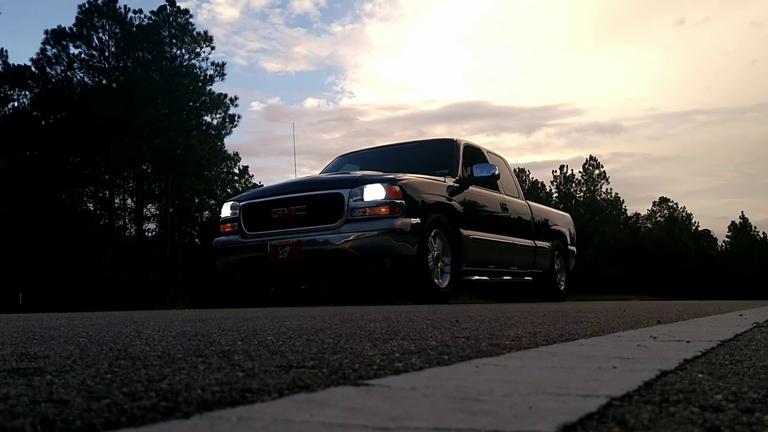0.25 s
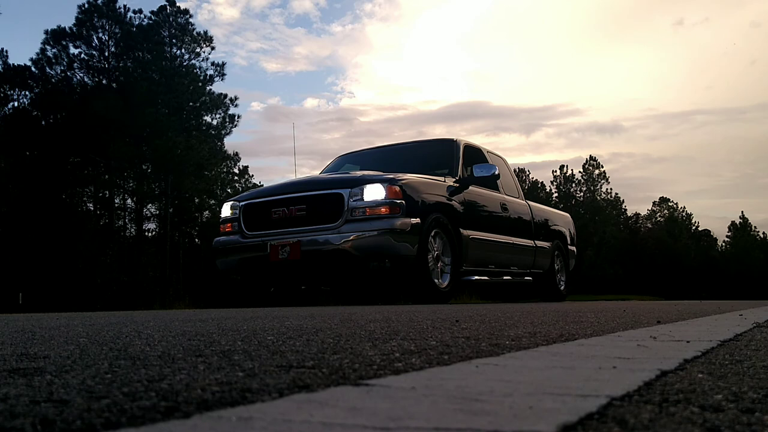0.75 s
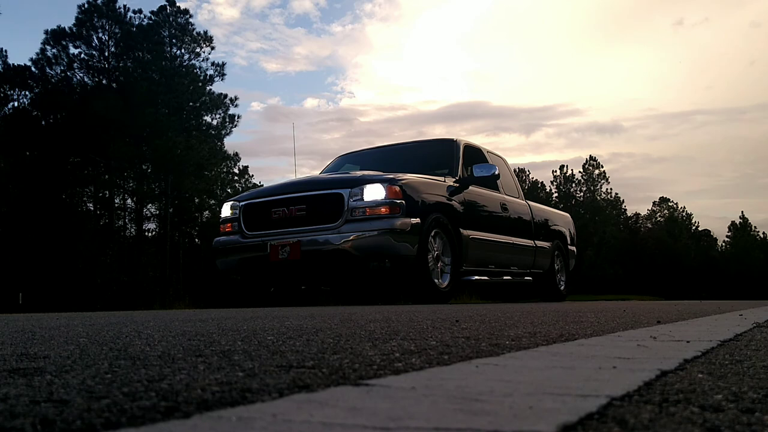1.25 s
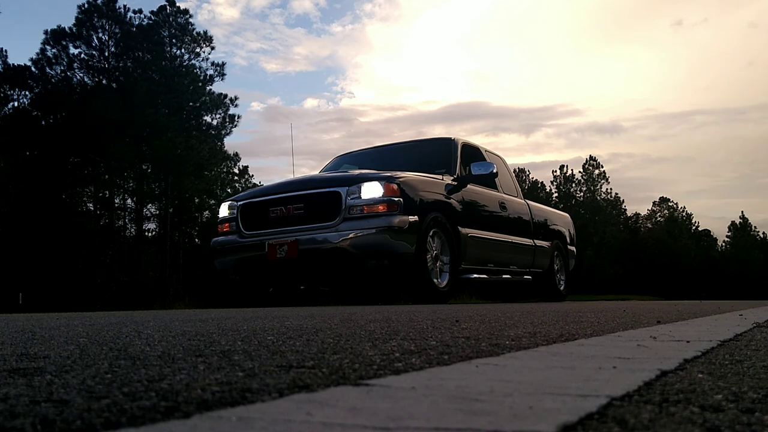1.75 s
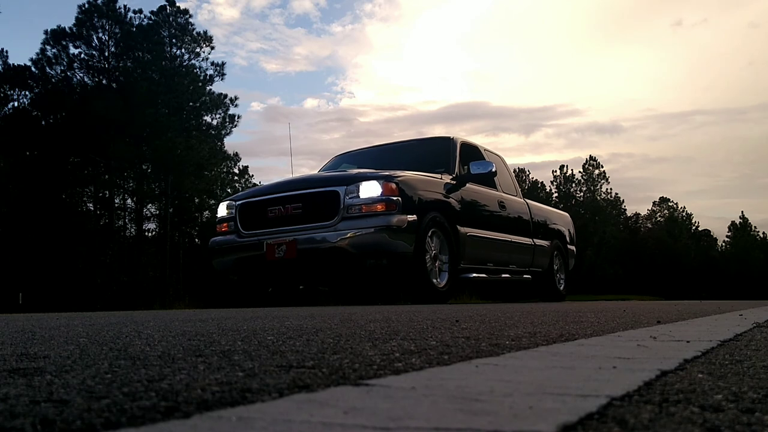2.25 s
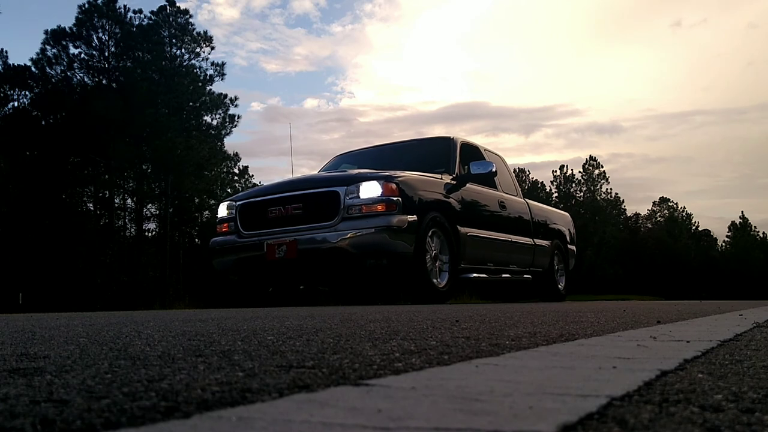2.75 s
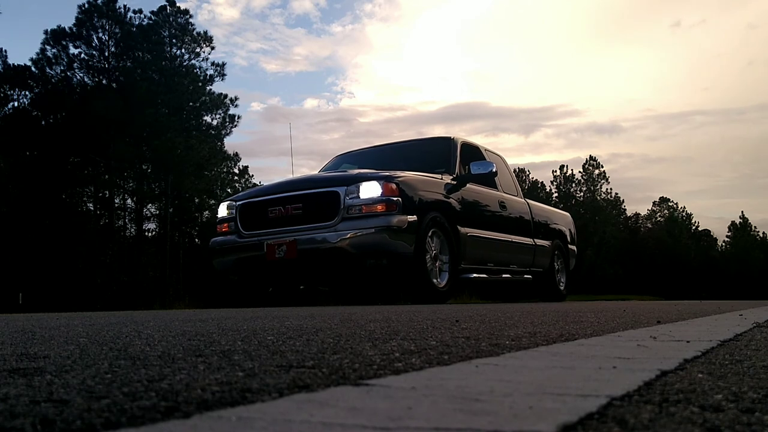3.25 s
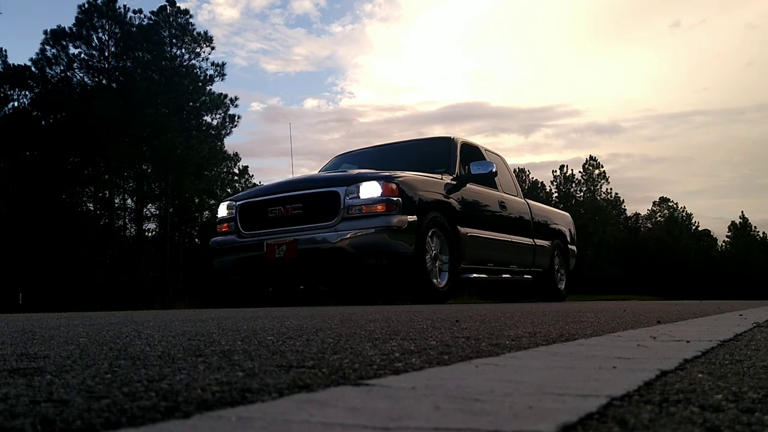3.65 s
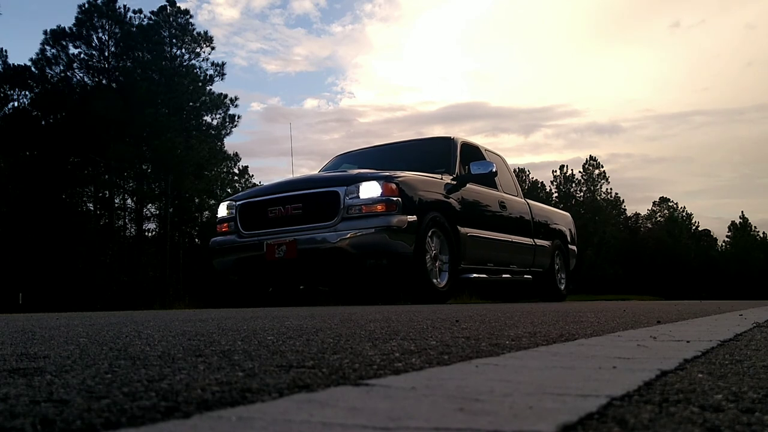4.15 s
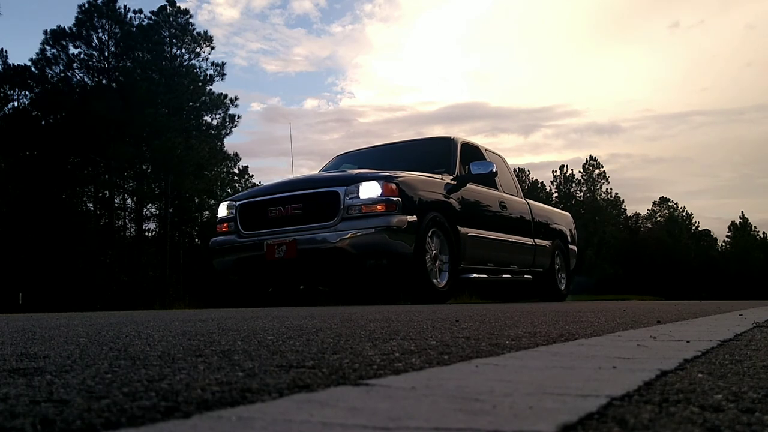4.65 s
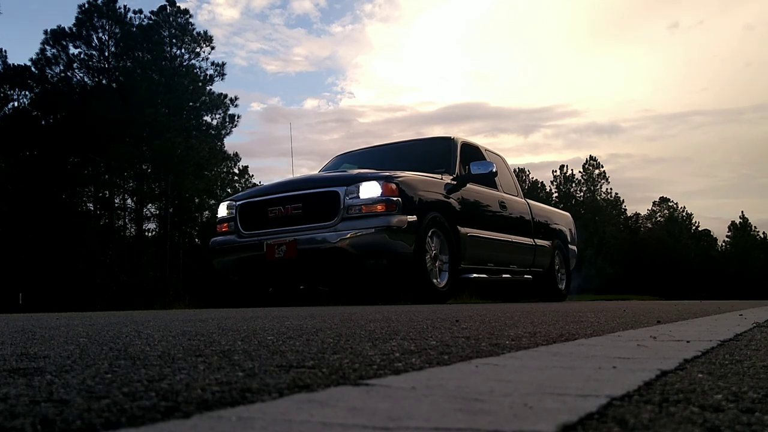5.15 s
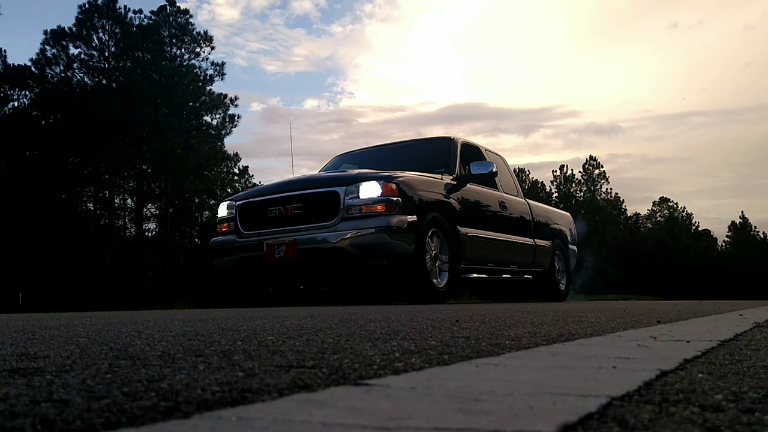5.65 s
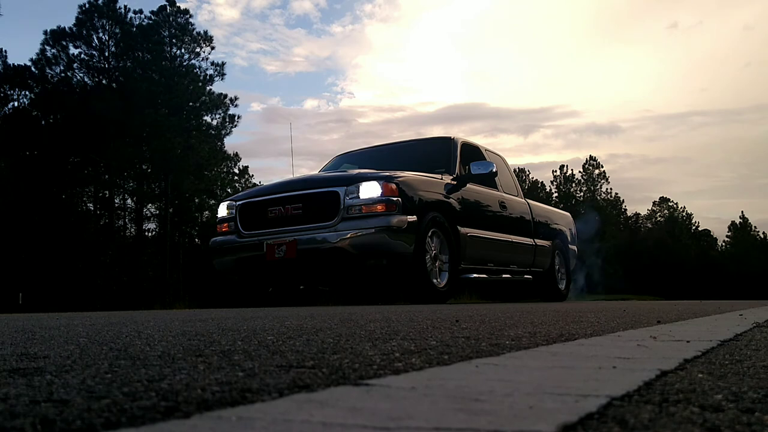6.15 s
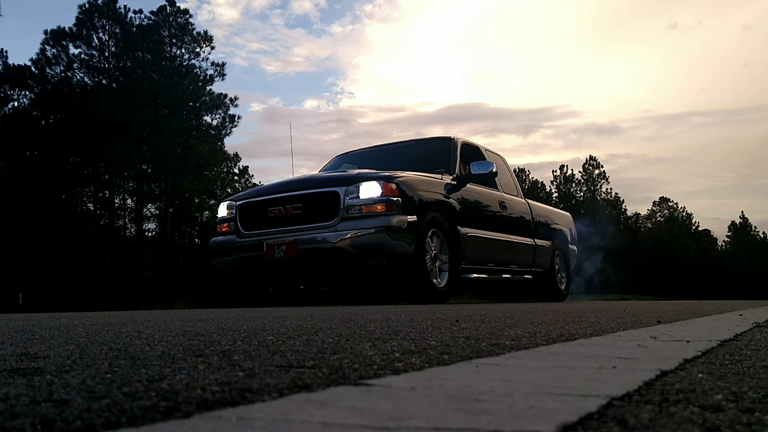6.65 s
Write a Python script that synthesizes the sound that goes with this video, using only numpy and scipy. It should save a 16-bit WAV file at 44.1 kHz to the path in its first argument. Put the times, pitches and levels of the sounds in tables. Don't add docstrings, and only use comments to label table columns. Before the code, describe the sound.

A truck held on its brakes: soft low idle, small bright valve ticks, then a quick swell to a deep, uneven exhaust roar with intake hiss. Rough rubber scrubbing starts about two seconds in, short squeaks compete, a dull knock sounds, and one piercing screech takes over, wavering with each wheel turn. Open roadside air, little echo, stereo microphone ahead of the truck with automatic gain ducking the engine under the squeal.

```python
import sys
import numpy as np
from scipy import signal
from scipy.fft import rfft, irfft, next_fast_len
from scipy.io import wavfile
from scipy.ndimage import uniform_filter1d, minimum_filter1d, map_coordinates

SR = 44100
rng = np.random.default_rng(int(sys.argv[2]) if len(sys.argv) > 2 else 0)


def output_pcm(signal):
    pcm = np.clip(np.atleast_2d(signal).T, -1, 1) * 32767
    wavfile.write(sys.argv[1], SR, np.round(pcm).astype(np.int16))


def to_linear_factor(level_db):
    exponent = np.asarray(level_db, float) / 20
    return 10 ** exponent


N = 304731

HOLD_HZ = 21.5
LOCK_S = 2.97


def unit(x):
    return x / np.sqrt(np.mean(np.abs(x) ** 2) + 1e-20)


def along(points, hz):
    f, v = np.transpose(points)
    return np.interp(np.log(hz + 1), np.log(f + 1), v)


def curves(rows):
    s, *cols = np.transpose(rows)
    return [np.interp(np.arange(N) / SR, s, c) for c in cols]


def since(s):
    return np.clip(np.arange(N) / SR - s, 0, None)


def sounding(rows, fade=0.017):
    s0, s1 = rows[0][0], rows[-1][0]
    return np.interp(np.arange(N) / SR, [s0 - fade, s0, s1, s1 + fade], [0, 1, 1, 0])


def bumps(rows, width_s):
    return sum(db * np.exp(-((np.arange(N) / SR - s) / width_s) ** 2) for s, db in rows)


def wobble(rate):
    knots = rng.standard_normal(int(N * rate / SR) + 4)
    return map_coordinates(knots, [np.arange(N) * rate / SR])


def filtered(x, response):
    m = next_fast_len(N + 8192)
    mirror = x[..., :-2049:-1] * np.linspace(1, 0, 2048)
    x = np.concatenate([x, mirror], axis=-1)
    return irfft(rfft(x, m) * response(np.fft.rfftfreq(m, 1 / SR)), m)[..., :N]


def rush(spectrum, alike, patchy_db):
    z = signal.stft(rng.standard_normal((2, N)), nperseg=512)[2]
    field = uniform_filter1d(rng.standard_normal(z.shape[1:]), size=5, axis=0)
    field = uniform_filter1d(field, size=8, axis=1)
    pair = signal.istft(z * to_linear_factor(patchy_db * unit(field)), nperseg=512)[1][:, :N]
    closed = [(0.97, -120)] + list(spectrum) + [(17000, -120)]
    shape = lambda hz: to_linear_factor(along(closed, hz))
    turn = lambda hz: np.arccos(np.clip(along(alike, hz), -1, 1)) / 2
    mid, side = filtered(pair, lambda hz: shape(hz) * [np.cos(turn(hz)), np.sin(turn(hz))])
    return unit(np.array([mid + side, mid - side]))


def note(hz, jitter_hz, flutter_db, rate):
    turns = np.cumsum(hz + jitter_hz * wobble(rate)) / SR
    return unit(to_linear_factor(flutter_db * wobble(rate)) * np.exp(2j * np.pi * turns))


# (time [s], offset from its note [Hz], level [dB])
CATCH = [
    (2.71, -30, -22.5),
    (2.73, -16, -9.5),
    (2.76, -5, -1),
    (2.82, 15, -1.5),
    (2.9, 17.5, -4.5),
    (2.94, 36.5, -11),
    (2.96, 6, -1),
    (2.98, 0, -0.5),
]
# (share of the turn [0-1], pitch offset [Hz], level [dB])
TURN = [
    (0, 0, -1),
    (0.199, -13, -0.66),
    (.45, -5, 0.16),
    (0.699, 8, -0.4),
    (.88, 12, 0.4),
    (1.002, 0, -2),
]
# (time [s], depth [dB])
SLIPS = [(2.84, 0.5), (3.68, 1.5), (3.73, 4), (5.12, 3.5), (5.2, 4.5), (5.31, 2.5), (5.5, 1.5), (5.64, 3),
         (5.71, 1.5), (5.88, 0.5), (6.12, 4), (6.17, 1.5), (6.73, 4)]


def squeal():
    start_hz, sag_hz_per_s2 = 1114.5, 2.6
    start_db, fade_db_per_s = -3.5, 0.83
    spun = since(2.95)
    share = (2.27 * spun + .11 * spun ** 2 / 2) % 1
    at, turn_hz, turn_db = np.transpose(TURN)
    catch_hz, catch_db = curves(CATCH)
    slip_db = bumps(SLIPS, 0.019) - catch_db
    wave_hz = np.interp(share, at, turn_hz) * (1 + .2 * wobble(3))
    hz = start_hz - sag_hz_per_s2 * since(LOCK_S) ** 2 + wave_hz + catch_hz
    db = start_db - fade_db_per_s * since(LOCK_S) + np.interp(share, at, turn_db) - slip_db
    return hz, db, slip_db


def locked_tone(main, lock):
    grip = to_linear_factor((.5 + .1 * since(LOCK_S)) * wobble(50)) * (1 + .1 * wobble(260))
    third_db = np.interp(np.arange(N) / SR, [3, 5.3, 5.8, 6.9], [-15.5, -7, 4.0, 7.0])
    second = to_linear_factor(-27 + 0.74 * wobble(5.5)) * main ** 2
    third = to_linear_factor(-27 + third_db) * main ** 3
    carcass_shake = to_linear_factor(-22.0) * main * note(115, jitter_hz=31.34, flutter_db=-3.0, rate=14)
    return lock * (grip * main + second + third + carcass_shake)


# (time [s], level [dB])
KICKS = [
    (2.791, 3.7),
    (2.885, 9),
]


def upper_note(main, hz):
    gone = since(CATCH[0][0])
    follow_hz = .7 * (hz - uniform_filter1d(hz, size=18000))
    under_hz = 128 + 19 * gone + 2 * wobble(4) + follow_hz
    grit = .4 * (wobble(150) + 1j * wobble(150))
    beads = unit(np.clip(1 + .7 * wobble(75), 0, None) + grit)
    beat = beads * note(under_hz, jitter_hz=20, flutter_db=1, rate=45)
    db = -20 - 1.5 * since(LOCK_S) + bumps(KICKS, .02) + 0.92 * curves(CATCH)[1] + 0.54 * wobble(25)
    return main ** 2 * beat.conj() * to_linear_factor(db) * (gone > 0)


def rival(rows, jitter_hz, flutter_db, fray):
    hz, db = curves(rows)
    grit = 1 + fray * (wobble(240) + 1j * wobble(240))
    return unit(grit * note(hz, jitter_hz, flutter_db, rate=45)), to_linear_factor(db + 4.0) * sounding(rows)


# (time [s], length [s], start pitch [Hz], end pitch [Hz], level [dB])
RIVALS = [(2.18, 0.23, 1065, 1068, -24), (2.21, 0.1, 950, 950, -30), (2.23, 0.13, 1200, 1220, -24),
          (2.31, 0.14, 1178, 1150, -20.5), (2.33, .14, 1080, 1067, -20), (2.42, .14, 1210, 1265, -18),
          (2.45, .15, 1115, 1158, -22), (2.54, 0.067, 1270, 1356, -22), (2.58, 0.08, 1238, 1208, -14),
          (2.63, .1, 1100, 1080, -23.5), (2.67, 0.077, 1190, 1233, -16)]


def rivals():
    edge_s = 0.0191
    rough = rival([(0, 0, 0)], jitter_hz=8, flutter_db=1.5, fray=.5)[0]
    out = np.zeros(N, complex)
    for k, (s, life, from_hz, to_hz, db) in enumerate(RIVALS):
        t = np.arange(-2 * edge_s, life + 2 * edge_s, 1 / SR)
        turns = from_hz * t + (to_hz - from_hz) * t ** 2 / (2 * life)
        z = rough[k * SR // 2:][:len(t)] * np.exp(2j * np.pi * turns)
        edge = np.clip((life / 2 - np.abs(t - life / 2)) / (2 * edge_s) + .5, 0, 1)
        out[round((s + t[0]) * SR):][:len(t)] += to_linear_factor(db + 4.0) * edge * (z + to_linear_factor(-8.5) * z ** 2)
    return out


# (frequency [Hz], level [dB per Hz])
BODY = [(500, -29), (800, -10), (1000, 0.5), (1250, 0.5), (1500, 0), (1900, -2), (2900, -7), (4800, -21),
        (6000, -27.5), (7500, -46.5), (11000, -36), (15500, -58)]
# (frequency [Hz], level [dB per Hz])
RASP = [(1700, -39.5), (1950, 0.5), (2300, 2.5), (2650, -3), (3000, -14.5), (3500, -2), (4500, -31)]
# (frequency [Hz], likeness [0-1])
REAR = [(600, 1), (1700, .95), (2400, .65), (3000, .8), (4300, .92), (5200, .5), (12000, 0.43)]


def scrub(slip_db):
    break_s, spin_s = 2.08, 2.32
    stuck = np.clip(1 - since(break_s) / (spin_s - break_s), 0, 1)
    choked = np.clip(since(CATCH[0][0] - .05) / 0.41, 0, 1)
    burst_db = uniform_filter1d(slip_db * (since(CATCH[2][0]) > 0), size=2000)
    body_db = -24 - 13 * stuck + 0.82 * burst_db + 0.3 * wobble(12)
    rasp_db = -21.5 - 21 * stuck - 6 * choked - 2.26 * since(LOCK_S) + 1.2 * wobble(12)
    body = to_linear_factor(body_db) * rush(BODY, REAR, patchy_db=1.5)
    rasp = to_linear_factor(rasp_db) * rush(RASP, REAR, patchy_db=1.5)
    return sounding([(break_s,), (N / SR,)], fade=0.13) * (body + rasp) * to_linear_factor(0.71 * wobble(90))


# (time [s], pitch [Hz], level [dB])
SIDELONG = [
    (2.76, 1343, -34),
    (2.99, 1308, -27),
    (3.51, 1358, -25.5),
    (3.85, 1353, -34.5),
    (4.5, 1340, -35),
    (4.9, 1400, -38),
]


def tyres():
    hz, db, slip_db = squeal()
    main = note(hz, jitter_hz=6, flutter_db=0, rate=75)
    lock = to_linear_factor(db) * (since(CATCH[0][0]) > 0)
    upper = upper_note(main, hz)
    side, level = rival(SIDELONG, jitter_hz=5.7, flutter_db=-1.5, fray=0.43)
    tone = locked_tone(main, lock) + rivals()
    tone += upper * (1 + to_linear_factor(0.5) * main + to_linear_factor(-11.0) * main ** 2 + to_linear_factor(-24.5) * main.conj())
    tone += level * side * (1 + to_linear_factor(11.0) * upper)
    tone += level * to_linear_factor(-7) * main ** 2 * side.conj()
    return tone.real + scrub(slip_db)


# (shut level [dB], open level [dB], rise time [s], gasp [dB])
ROAR_OPENS = (-62, -26.5, 0.26, 5)
HISS_OPENS = (-65, -47, .09, 10)
GASP_LENGTH_S = .035


def opening(shut_db, open_db, rise_s, gasp_db):
    climb = (shut_db - open_db) * np.exp(-since(1.33) / rise_s)
    return open_db + climb + bumps([(1.265, gasp_db)], GASP_LENGTH_S)


# (time [s], four-stroke cycles per second [Hz])
REVS = [(1.15, 6.85), (1.36, 7.97), (1.5, 10.1), (1.69, 14.4), (1.82, 17.3), (1.9, 19.0), (2.01, 20.4),
        (2.09, 21.1), (2.3, 21.9), (2.61, 21.2), (3.17, 21.2), (3.87, 21.4), (6.23, 21.8), (6.9, 21.9)]
# (multiple of the cycle, level [dB])
ORDER = [(1, -30.5), (2, -33), (3, -6.5), (4, -17.5), (5, 3), (6, -26), (7, -20.5), (8, 2.5), (9, 0),
         (10, -1), (11, -13.5), (12, -15), (13, -18), (14, -15), (15, -42), (16, -10), (17, -8), (18, -16),
         (19, -5.5), (20, -9), (21, -36), (22, -20.5), (23, -19.5), (24, -24), (25, -21.5), (26, -5.5),
         (27, -13.5), (28, -31.5), (29, -27.5), (30, -22), (31, -21.5), (32, -4.5), (33, -14.5)]
# (frequency [Hz], level [dB])
PIPE = [(25, -29), (45, -9), (65, 1.5), (95, 6.5), (118, 12.5), (145, -6), (200, 13.5), (250, -0.5),
        (700, 8.5)]
# (multiple of the cycle, boost [dB])
BOOMS = [(8, 17), (10, 3.6), (12, 11)]


def exhaust(cycle_hz, turns, duck_db):
    boom_hz, boom_width_hz = 114.5, 18.7
    boom_db = sum(db * np.exp(-((k * cycle_hz - boom_hz) / boom_width_hz) ** 2) for k, db in BOOMS)
    db = -20 + 1.64 * (cycle_hz - HOLD_HZ) + boom_db
    db += -0.31 * since(LOCK_S) + 0.89 * duck_db
    dull_db = -1.7 * (1 - cycle_hz / HOLD_HZ)
    ragged_db = .56 + 5 * np.abs(1 - cycle_hz / HOLD_HZ)
    lines, power = 0, 0
    for i, (k, line_db) in enumerate(ORDER):
        pipe_db = along(PIPE, k * cycle_hz) - along(PIPE, k * HOLD_HZ)
        gain = to_linear_factor(line_db + k * dull_db + pipe_db + ragged_db * wobble(20))
        shift = k % 2 / 4 + (k > 11) * rng.random()
        lines = lines + gain * np.sin(2 * np.pi * (k * turns + shift))
        if i < 10:
            power = power + gain * gain
    out = to_linear_factor(db) * lines / np.sqrt(power)
    out *= np.interp(np.arange(N) / SR, [1.36, 1.47], [0, 1])
    echo_tone = lambda hz: to_linear_factor(-19) / (1 + (110 / (hz + 1)) ** 4)
    return out + filtered(out, lambda hz: echo_tone(hz) * np.exp(-2j * np.pi * hz * .006) * [[1], [-1]])


# (frequency [Hz], level [dB per Hz])
ROAR = [(30, -27), (60, -7), (130, -3.5), (210, -1.5), (270, -7), (435, -5.5), (650, -4), (900, -9),
        (1120, -5.5), (1430, -9.5), (2450, -10.5), (3600, -16), (4700, -48)]
# (frequency [Hz], level [dB per Hz])
FAN = [(2000, -34), (3400, -8.5), (4050, 1.5), (5240, -7.5), (7000, -22.5), (9100, -52.5), (15400, -120)]
# (frequency [Hz], level [dB per Hz])
INTAKE = [(3530, -25), (6000, -5), (7290, -10), (7710, -9), (9330, 0), (12100, 3.5), (15500, -12.5)]
# (frequency [Hz], likeness [0-1])
FRONT = [(60, .999), (290, 1), (640, 1), (1400, 0.78), (3100, 0.64), (6800, 0.089), (15000, .05)]
# (multiple of the cycle, level over the roar [dB])
PULLEYS = [(97, -11), (121, -13)]


def engine(duck_db):
    cycle_hz, = curves(REVS)
    turns = np.cumsum(cycle_hz * (1 + .002 * wobble(25))) / SR
    throttle_db = opening(*ROAR_OPENS)
    roar_db = throttle_db + 1.045 * duck_db
    hiss_db = opening(*HISS_OPENS) + .5 * duck_db + .7 * (cycle_hz - HOLD_HZ)
    hiss_db += -1.54 * since(LOCK_S) + 1.5 + 0.57 * wobble(5.4)
    throb = 1 + 0.04 * np.sin(4 * np.pi * turns) + 0.11 * np.sin(16 * np.pi * turns)
    roar = to_linear_factor(roar_db + 2.0) * throb * rush(ROAR, FRONT, patchy_db=0.5)
    hiss = to_linear_factor(hiss_db) * throb * rush(INTAKE, FRONT, patchy_db=2.5)
    held = np.interp(np.arange(N) / SR, [2.7, 2.8], [0, 1])
    roar += held * (to_linear_factor(-7) - 1) * filtered(roar, lambda hz: 1 / (1 + (800 / (hz + 1)) ** 4))
    edge_db = throttle_db + 1.1 * duck_db - 12 + held * (-5.0 + 2.7 * wobble(23))
    edge = to_linear_factor(edge_db) * rush(FAN, FRONT, patchy_db=-2.0)
    whines = sum(to_linear_factor(roar_db + db) * note(k * cycle_hz, 12, 1.9, rate=25).real for k, db in PULLEYS)
    return exhaust(cycle_hz, turns, duck_db) + sounding(REVS, fade=.1) * (roar + edge + hiss + whines)


# (time [s], level [dB], pitch [Hz], 60 dB decay [s])
THUD = (2.718, -19, 285, .08)


def thud():
    s, db, hz, t60 = THUD
    t = since(s)
    modes = np.sin(2 * np.pi * hz * t) + .6 * np.sin(2 * np.pi * 1.28 * hz * t)
    return to_linear_factor(db - 60 * t / t60) * modes


# (time [s], pitch [Hz], level [dB])
IDLE = [
    (0.0, 109.4, -44),
    (0.266, 110.8, -47),
    (0.344, 107.5, -43),
    (0.504, 106.4, -45),
    (0.6, 102.1, -41.5),
    (1.148, 99.7, -44),
    (1.324, 95.1, -48),
    (1.502, 98.7, -28.5),
    (1.55, 93.5, -27),
]


def idle():
    hz, db = curves(IDLE)
    db += 1.5 * wobble(12)
    drone = note(hz, jitter_hz=2.0, flutter_db=-0.5, rate=54)
    overtones = to_linear_factor(-15.5) * drone ** 2 + to_linear_factor(0.67 * db - 2.5) * (drone ** 3 + drone ** 4)
    hum = to_linear_factor(db + 4.0) * sounding(IDLE) * (drone + overtones).real
    belt_hz = 9.55 * uniform_filter1d(hz, size=SR // 2)
    whine = to_linear_factor(-59) * np.clip(since(.3) / .3, .2, 1) * note(belt_hz, 9, 3, rate=30).real
    return hum + whine


# (time [s], peak level [dB], length [s])
TICKS = [
    (0.114, -59, 0.009),
    (0.342, -62, 0.0059),
    (0.565, -66, 0.013),
    (0.8094, -62, 0.01),
    (1.022, -61, 0.008),
    (1.247, -60, 0.019),
]


def ticks():
    t = np.arange(N) / SR
    puffs = sum(to_linear_factor(db - 7.5) * np.exp(-((t - s - life) / life) ** 2) for s, db, life in TICKS)
    return puffs * rush(INTAKE, FRONT, patchy_db=3.0)


# (frequency [Hz], level [dB per Hz])
AIR = [(25, -23), (53, -16.5), (100, -8.5), (204, -17.5), (331, -19.5), (684, -20.5), (1100, -23),
       (2010, -27.5), (3530, -32.5), (5200, -42.5), (7110, -53), (10900, -45.5), (13500, -45), (15600, -47)]
# (time [s], level [dB])
STUMBLE = [
    (1.265, 3),
    (1.34, -3),
]


def clatter_and_air():
    db = -48 + .4 * wobble(5.0) + bumps(STUMBLE, GASP_LENGTH_S)
    return to_linear_factor(db) * rush(AIR, FRONT, patchy_db=2.5)


def ducking(loud):
    knee_db, squeeze, follow_s = -18.5, 1.008, .08
    size = int(follow_s * SR)
    power = np.abs(uniform_filter1d(loud ** 2, size=size, origin=int(follow_s * SR / 3)))
    return -squeeze * np.clip(10 * np.log10(power + 1e-12) - knee_db, 0, None)


# (frequency [Hz], delay [s])
LAG = [(800, 6e-5), (1100, 9.5e-5), (2000, 1.02e-4), (3000, 1.2e-4), (4200, 1.08e-4)]
# (time [s], left over right [dB])
DRIFT = [
    (2.2, 1.0),
    (2.51, 2.5),
    (2.8, 0.5),
    (5.35, 0.8),
    (5.6, 1.5),
    (6.9, 2.0),
]


def scene():
    side = np.array([[1], [-1]])
    rubber = tyres()
    rear = filtered(rubber, lambda hz: np.exp(-1j * np.pi * hz * along(LAG, hz) * side))
    rear = rear * to_linear_factor(side * curves(DRIFT)[0] / 2)
    front = engine(ducking(rubber.mean(axis=0))) + thud() + idle() + ticks()
    return rear + front + clatter_and_air()


def roll_off(x):
    return signal.sosfilt(signal.butter(12, 15670, fs=SR, output="sos"), x)


# (frequency [Hz], left over right [dB])
PORTS = [(60, 0), (130, .6), (400, 0), (1500, 0), (4400, -1.2), (8000, 2.6), (15000, 3.4)]


def record(dry):
    top_hz, ceiling = 15700, .93
    heard = filtered(dry, lambda hz: to_linear_factor(along(PORTS, hz) * [[.5], [-.5]]) * (hz < top_hz))
    needed = np.minimum(1, ceiling / (np.abs(heard).max(axis=0) + 1e-9))
    gain = uniform_filter1d(minimum_filter1d(needed, size=801), size=401)
    gain *= np.clip((N - np.arange(N)) / 150, 0, 1)
    return roll_off(heard * gain)


dry = scene()
out = record(dry)
output_pcm(out)
```